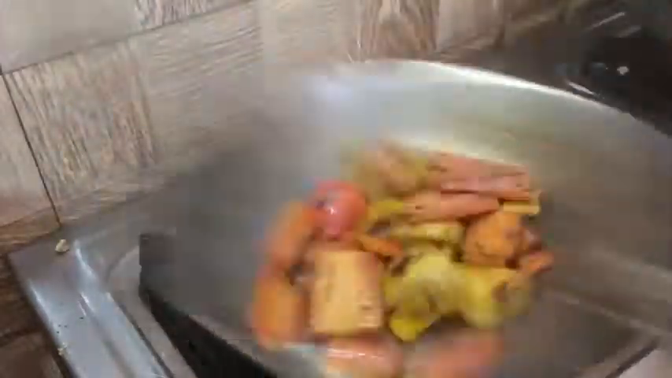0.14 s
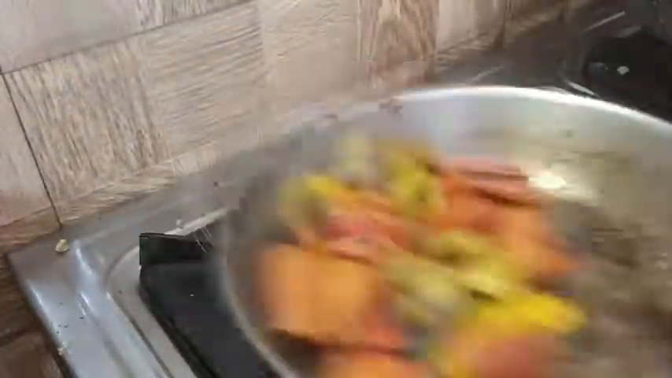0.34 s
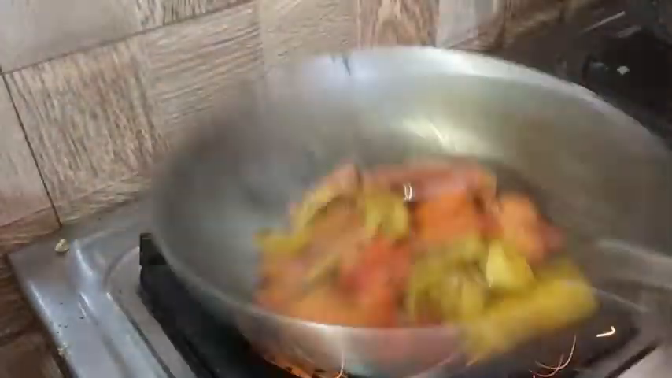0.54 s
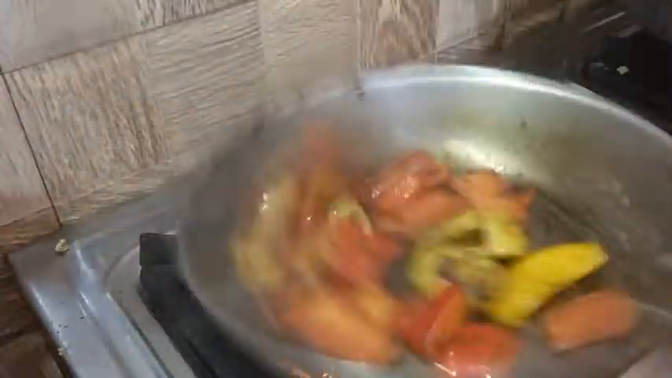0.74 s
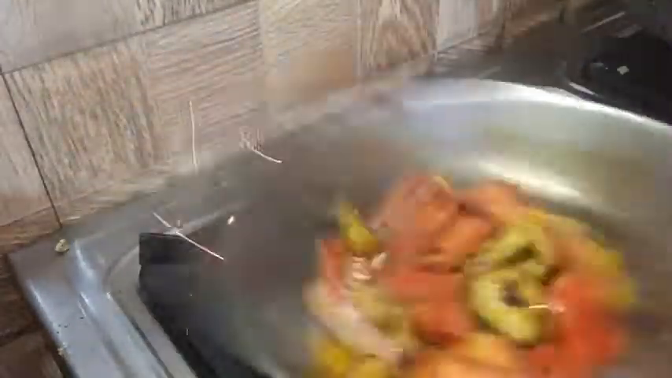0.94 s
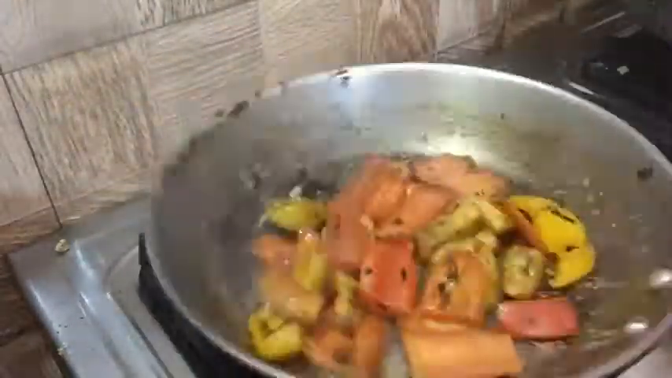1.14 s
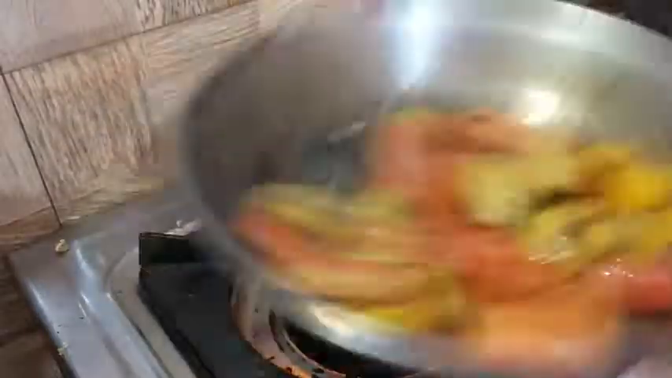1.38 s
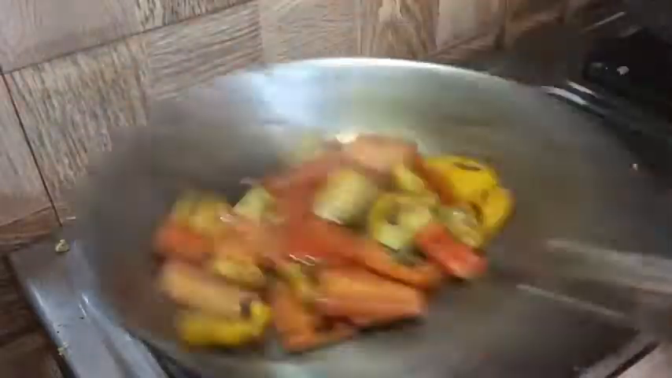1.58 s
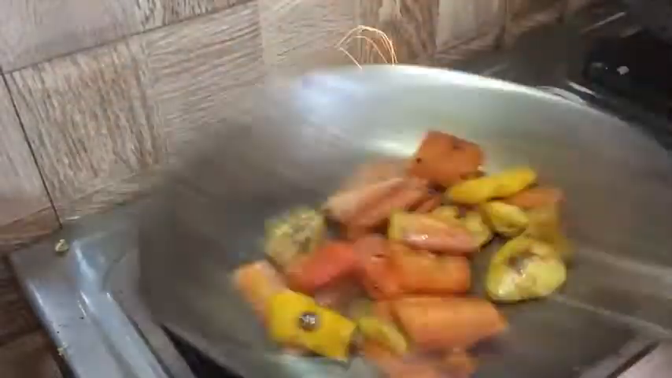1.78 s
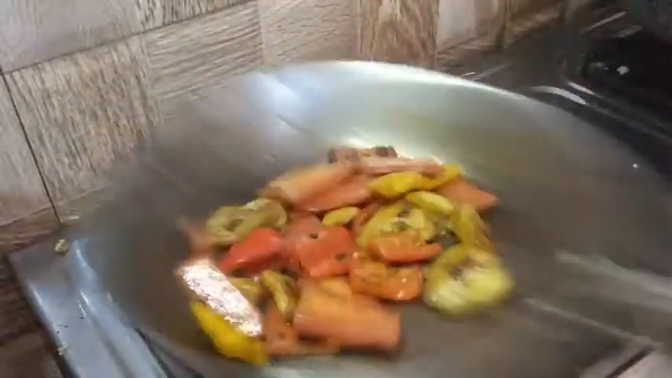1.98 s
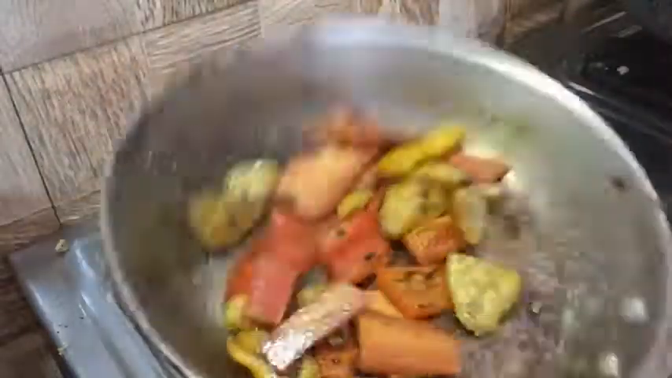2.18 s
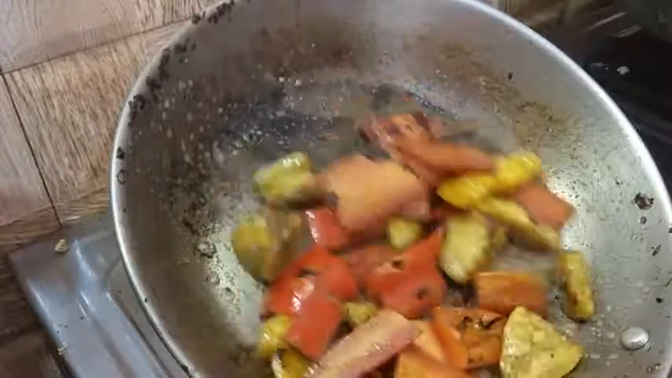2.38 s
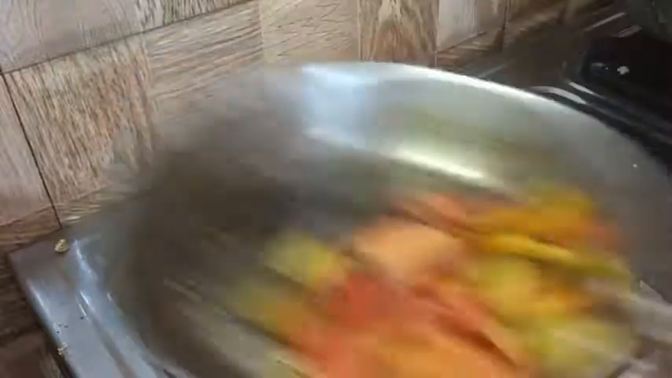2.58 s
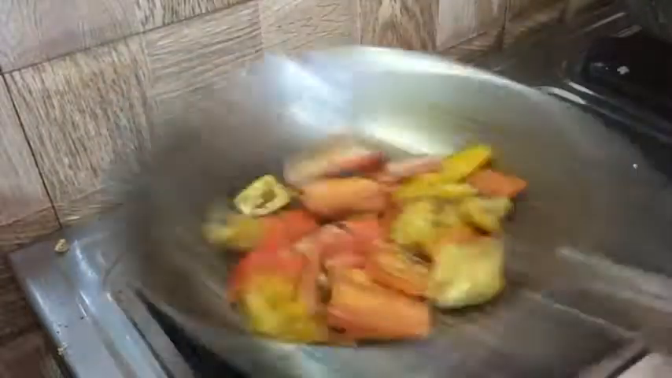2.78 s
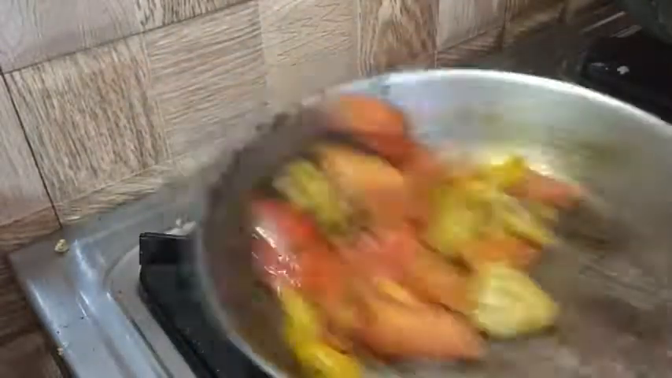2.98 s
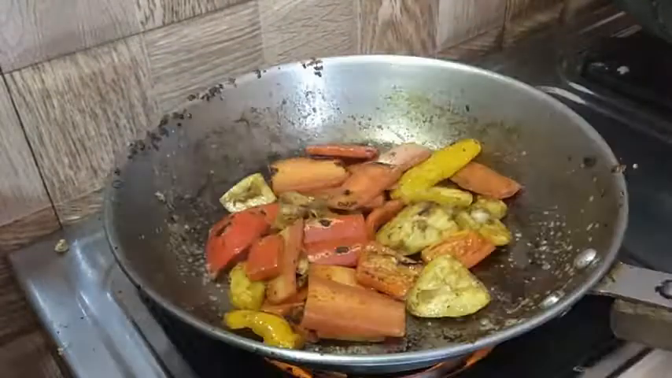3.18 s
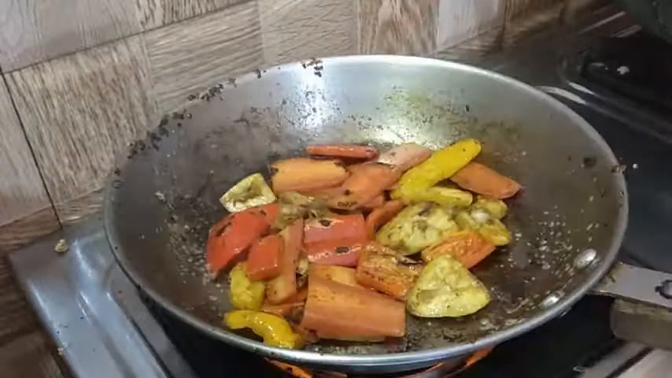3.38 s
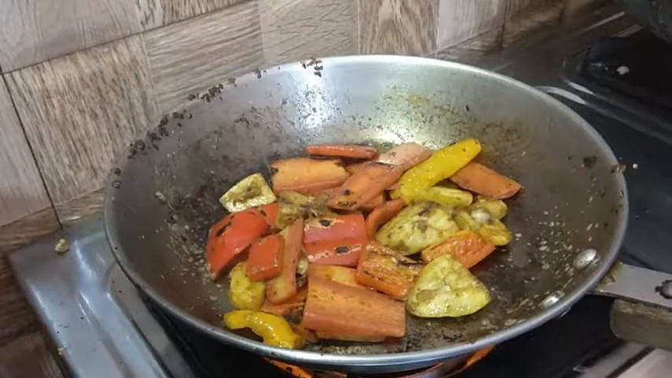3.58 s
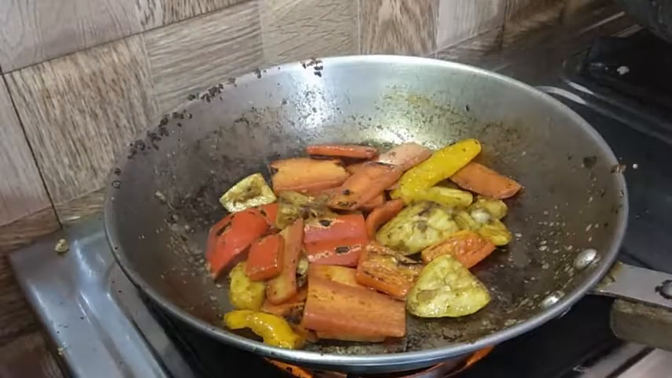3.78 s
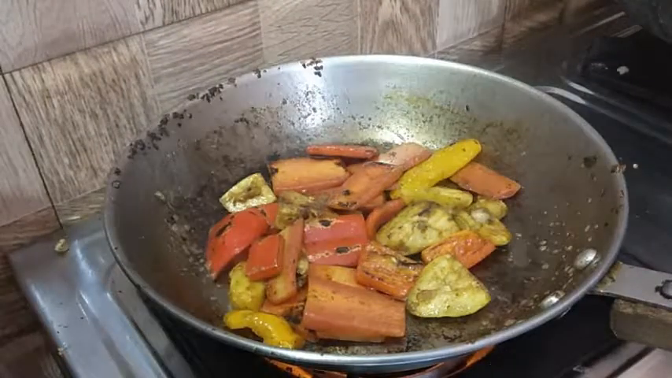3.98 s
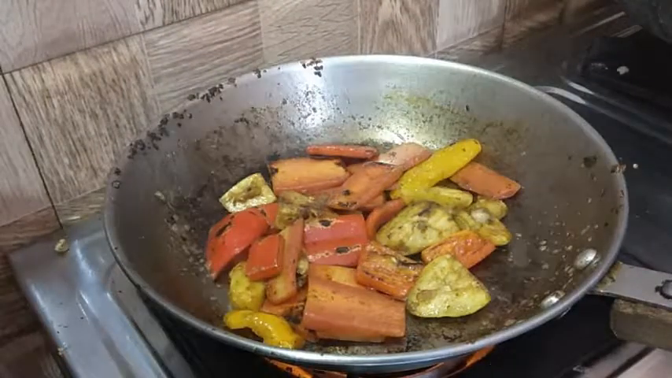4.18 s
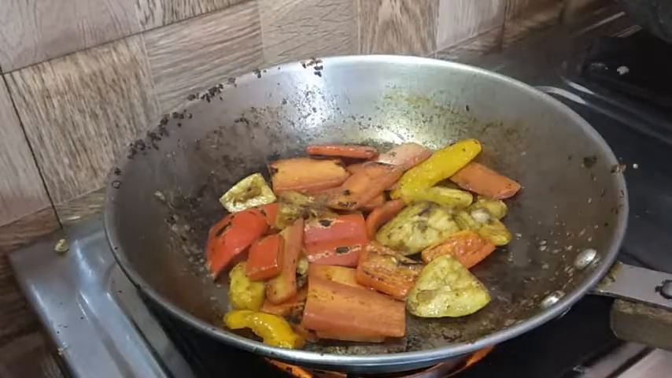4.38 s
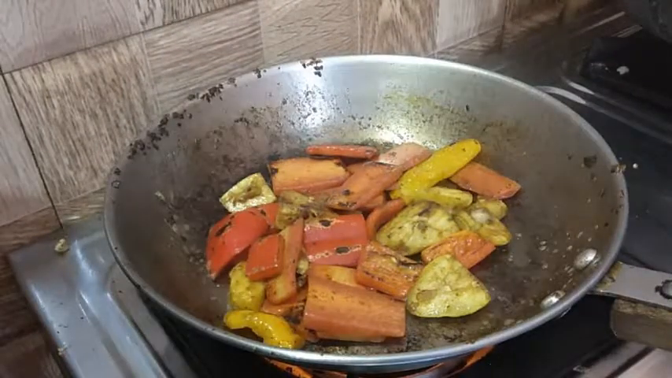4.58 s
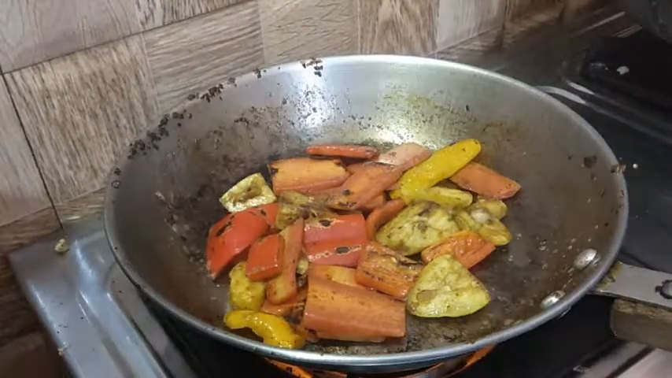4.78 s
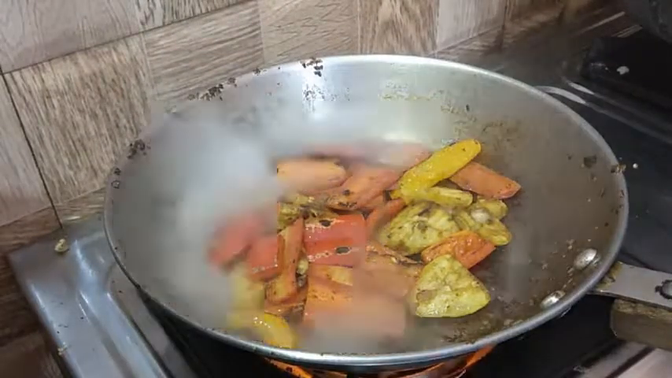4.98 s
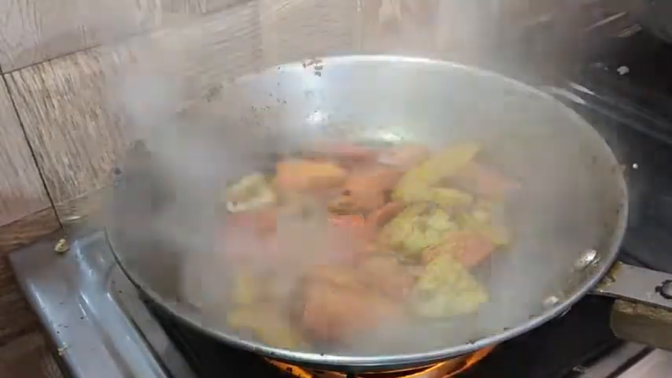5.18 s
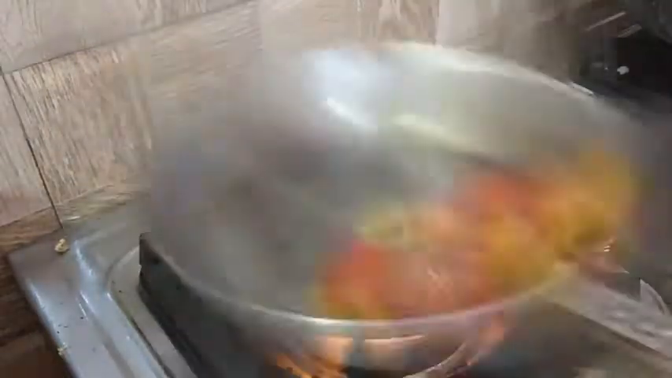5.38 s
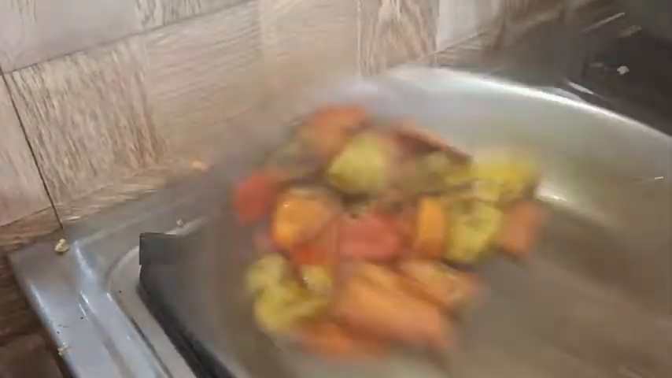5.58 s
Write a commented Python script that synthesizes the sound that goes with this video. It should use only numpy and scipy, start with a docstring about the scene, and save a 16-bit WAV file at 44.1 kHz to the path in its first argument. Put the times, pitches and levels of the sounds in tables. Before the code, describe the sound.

A close, phone-like kitchen sound of a steel wok being tossed on a gas stove. From the very start, rough, ringing metal knocks and scrapes follow each other many times a second, with bright frying sizzle beneath; a tiny high squeak slips in around 0.65 s. The clatter thins after 1.0 s, the sizzle briefly drops near 1.25 s, and hard banging returns from 1.5 to 2.1 s. A pause leaves sizzle, fading then snapping back at 2.3 s, and burner hum. A third run of rattling lasts from 2.5 to about 3.1 s. Then the pan sits still: soft crackling oil over a wavering, mid-low flame hum and roar, with sharp spits near 4.0, 4.2, 4.4 and 4.6 s. At about 4.9 s a sharp spit and a burst of hissing steam flare up as the burner suddenly dips, then recovers. Metal clatter resumes at 5.25 s over rising sizzle until the cut at 5.6 s.

```python
"""Sharp metal knocks and scrapes: a steel wok of vegetables is shaken on the iron stand of a gas stove.
Each knock is a rasp of random clicks that rings the pan's modes; one brief squeak has a strong octave.
Oil sizzles as coloured noise and clicks, fading twice and returning at once, with loud spits and one
burst of steam. Below lies the burner: wavering tones and a soft noise roar, with one sudden dip.
A close phone dulls the top, limits the loudest knocks and thins the bass."""
import sys
import numpy as np
from scipy import signal
from scipy.fft import rfft, irfft
from scipy.io import wavfile
from scipy.ndimage import uniform_filter1d, minimum_filter1d

SR = 44100
rng = np.random.default_rng(int(sys.argv[2]) if len(sys.argv) > 2 else 0)


def digitize_waveform(pressure):
    """Quantize a signal to 16-bit integers and store it at the path in sys.argv[1].

    Rows of a 2-D input are taken as channels; values are limited to [-1, 1].
    """
    field = np.atleast_2d(pressure).T
    bounded = np.clip(field, -1, 1)
    quanta = np.round(bounded * 32767).astype(np.int16)
    wavfile.write(sys.argv[1], SR, quanta)


def boost(x):
    """Linear amplitude factor 10**(x/20) for a level x in decibels (scalar or array-like)."""
    u = np.asarray(x, float) / 20
    return 10 ** u


N = 248724  # samples

# spectrum of frying oil: freq_hz, relative_level_db (per Hz)
SIZZLE_SPECTRUM = [(30, -3.5), (300, -12.5), (800, -9.5), (1100, -5.5), (1900, -0.5), (4000, -4),
                   (7000, -5), (12000, -7)]


def curve(rows):
    """Level against time: table points joined by straight lines."""
    time_s, level_db = np.transpose(rows)
    return np.interp(np.arange(N) / SR, time_s, level_db)


def colour(points, size):
    """Causal (minimum-phase) response with the given spectrum, from the folded cepstrum."""
    hz, db = np.transpose(points)
    log_freq = np.log(np.fft.rfftfreq(size, 1 / SR) + 1)
    log_gain = np.interp(log_freq, np.log(hz), db) * np.log(10) / 20
    cepstrum = irfft(log_gain)
    cepstrum[1:size // 2] *= 2
    cepstrum[size // 2 + 1:] = 0
    return np.exp(rfft(cepstrum))


def tinted(x, points):
    """Filter the sound to a fixed colour, rms 1."""
    y = signal.fftconvolve(x, irfft(colour(points, size=2048)))[:N]
    return y / np.std(y)


def walk(rate_hz):
    """Random levels held 1 / rate_hz s, smoothed twice over that time; spread near 1."""
    hold = int(SR / rate_hz)
    steps = np.repeat(rng.standard_normal(N // hold + 1), hold)
    return 1.735 * uniform_filter1d(uniform_filter1d(steps, hold), hold)[:N]


def grains(size, share, spread_db):
    """Random clicks on a share of the samples, of differing strength, rms 1."""
    present = rng.random(size) < share
    boost_db = spread_db * np.minimum(rng.exponential(size=size), 4.0)
    x = present * rng.standard_normal(size) * boost(boost_db)
    return x / np.std(x)


def resonance(f, hz, width_hz):
    """Response of one ringing mode, gain 1 at its centre."""
    return 1j * f * width_hz / (hz ** 2 - f ** 2 + 1j * f * width_hz)


def drag_force(t, t60_s, rise_ms):
    """Rough contact of pan and iron: clicks that rise, chatter and die away, hardest near the blow."""
    rise = 1 - np.exp(-1000 * t / rise_ms)
    decay = boost(-60 * (t / t60_s) ** 1.053)
    drag = grains(len(t), share=.4, spread_db=1.7) * rise * decay
    chatter_db = 0.84 * np.repeat(rng.standard_normal(len(t) // 128), 128)
    blow = 1 + 1.3 * np.exp(-t / .004)
    return drag * boost(chatter_db) * blow


def wok():
    """Each knock's drag sounds directly as a rasp and rings the pan in a new mix of modes."""
    # knocks on the stand: start_s, level_db (3 x rms of first 20 ms), t60_s, rise_ms (time constant),
    # low_ring_db (base strength of the low modes)
    knocks = [(.0014, 1, 0.19, 0.87, 6), (.0194, -4.5, 0.53, 2.5, 18), (.0651, -1.5, 0.32, 3.6, 15.5),
              (.1525, -0.5, 0.28, 1.9, 11), (.2104, 5.5, 0.15, .8, 13), (.2492, -1.5, 0.14, 2.5, 12),
              (.2762, 3, 0.23, 1, 12.5), (.3114, 2.5, 0.23, 2.8, 15.5), (.3294, -2, 0.19, 3.3, 9),
              (.381, 1.5, 0.2, 1.5, 11), (.4184, 2.5, 0.25, 3, 12.5), (.4887, -0.5, 0.35, 1, 14),
              (.5295, -11, 0.41, 3, 15), (.5852, 1.5, 0.21, 4.8, 15), (.6494, -4.5, 0.055, 1.8, 19),
              (.6987, -9.5, 0.21, 4.7, 16), (.7204, -1.5, 0.15, .74, 16), (.7392, -3.5, .2, 1.6, 10),
              (.7835, -4, .33, 1.5, 15), (.8132, -2.5, .09, 1.7, 18), (.849, -0.5, 0.13, 1.7, 19),
              (.8792, 1.5, 0.44, 0.86, 15), (.9679, 2, 0.22, 0.67, 16), (1.0294, -10.5, 0.082, 3.4, 19),
              (1.0694, -11, .12, 3.3, 11.5), (1.142, -6, 0.11, .37, 17), (1.2537, -8.5, 0.19, 0.46, 14.5),
              (1.4818, -11.5, 0.094, 1.8, -1), (1.5162, -2, 0.18, 0.44, 1), (1.5692, 6, 0.34, .63, 12),
              (1.6192, -2, .19, 2.2, 4), (1.6494, -4.5, 0.12, 2.4, 24), (1.688, 1, 0.33, 0.56, 16),
              (1.7372, -4, .27, 1.8, 18.5), (1.7622, 3, 0.2, 1.4, 6), (1.7894, .5, 0.2, 3.5, 16),
              (1.8685, 6, 0.22, 0.49, 13), (1.8976, -2.5, 0.37, 2.4, 13), (1.9775, 3.5, 0.19, 0.92, 12),
              (1.9994, 3, 0.29, 2.9, 14.5), (2.0394, -3.5, 0.3, 2.1, 15), (2.0832, 2.5, 0.11, 2.6, 6),
              (2.5298, -8, 0.31, 5.2, 17.5), (2.5794, -5, 0.28, 7.8, 16.5), (2.5998, -0.5, 0.095, 2.1, 18),
              (2.6301, 3.5, 0.2, 1.3, 11), (2.6959, -4.5, .26, 4.4, 15), (2.7478, -6, 0.2, 6.4, 20),
              (2.7949, -2.5, 0.2, 2.8, 13.5), (2.8094, -2.5, 0.14, 3.6, 15.5),
              (2.8557, -0.5, 0.26, 0.56, 13.5), (2.9192, -4, 0.2, 3.9, 13), (2.9722, -5, .26, 6, 15.5),
              (3.0125, -5, 0.28, 2.2, 14), (3.034, 1.5, .17, 2.6, 14.5), (3.0693, -9, 0.38, 2.1, 10),
              (5.2525, -1, 0.48, 0.73, 9), (5.3444, -6, 0.24, 4.5, 17.5), (5.3779, -3.5, 0.15, 2.2, 19),
              (5.3994, -2.5, 0.32, 2.9, 18), (5.441, 0, 0.21, 1.3, 10.5), (5.4698, -5, .2, 2.1, 15),
              (5.4995, -3.5, 0.15, 5, 14), (5.5315, -4, 0.22, 0.66, 15), (5.5594, -7.5, 0.46, 5.4, 19),
              (5.612, -1, 0.22, 2.5, 13)]
    # pan modes: freq_hz, width_hz, relative_level_db
    pan_modes = [(463.2, 14.4, -6.5), (532, 75, -11.5), (698, 28, -14), (705.5, 24.4, 4), (823.6, 13.6, -6),
                 (921, 25, -8.5), (1093.5, 19.6, -0.5), (1141, 21, -14), (1269, 42, 0), (1440, 14, -4),
                 (1647, 70, 1), (1830, 23, 5.5), (1900, 41, -24), (2215, 45, 3.5), (2307, 52, -3),
                 (2377, 77, -2), (2456, 98, 0), (2777, 114, -3), (2935, 35, -3), (3470, 150, -6),
                 (3850, 73, -2.5)]
    # direct rasp spectrum: freq_hz, relative_level_db (per Hz)
    rasp_spectrum = [(30, -31), (250, -30), (400, -30.5), (600, 3), (1000, 2.5), (2200, 3.5), (3200, -2.5),
                     (4000, -2), (6000, -5.5), (12000, -9)]
    low_ring_top_hz = 1200
    treble_db, treble_scatter_db = 2, 1.5  # rasp shelf above 4 kHz
    detune = .02  # random relative spread of upper modes, one shift per knock

    size = 16384
    t, f = np.arange(size) / SR, np.fft.rfftfreq(size, 1 / SR)
    low = np.array(pan_modes)[:, 0] < low_ring_top_hz
    rasp = colour(rasp_spectrum, size)
    out = np.zeros(N + size)
    draws = rng.standard_normal((len(knocks), len(pan_modes) + 2))
    for (start_s, level_db, t60_s, rise_ms, low_ring_db), (bright, shift, *mix) in zip(knocks, draws):
        drag = drag_force(t, t60_s, rise_ms)
        shelf_gain = boost(treble_db + treble_scatter_db * bright)
        shelf = 1 + (shelf_gain - 1) * 1j * f / (4000 + 1j * f)
        strength_db = np.where(low, low_ring_db + 0.81 * np.abs(mix), 5.7 + 2.2 * np.abs(mix))
        strength = boost(strength_db) * np.sign(mix)
        modes = []
        for hz, width_hz, mode_db in pan_modes:
            mode_hz = hz * (1 + detune * shift * (hz > low_ring_top_hz))
            modes.append(boost(mode_db) * resonance(f, mode_hz, width_hz))
        body = rasp * shelf + strength @ np.array(modes)
        knock = irfft(rfft(drag) * body)
        nominal_peak = 3 * np.std(knock[:int(.02 * SR)])
        i = int(start_s * SR)
        out[i:i + size] += boost(level_db) * knock / nominal_peak
    return out[:N]


def squeak():
    """A brief metal squeak: a tone and its equally strong octave under a half-sine swell."""
    # one squeak: start_s, length_s, pitch_hz, level_db (peak of each partial)
    squeak_event = (.64, .028, 3870, -19.0)
    start_s, length_s, pitch_hz, level_db = squeak_event
    t = np.arange(N) / SR - start_s
    phase = 2 * np.pi * pitch_hz * t
    swell = np.sin(np.pi * np.clip(t / length_s, 0, 1))
    return boost(level_db) * swell * (np.sin(phase) + np.sin(2 * phase))


def sizzle_level():
    """Frying gain: in each dip the sizzle fades, then returns at once."""
    # frying: time_s, level_db (ahead of dips)
    fry_level = [(0, -18.5), (.46, -18), (.68, -18), (1.19, -25), (1.5, -22), (1.9, -23.5), (2.5, -20.5),
                 (2.8, -21.5), (3.17, -26), (3.6, -25.5), (3.95, -26.5), (4.1, -24), (4.2, -26),
                 (4.5, -29.5), (4.7, -26), (4.9, -28.5), (5.3, -19), (5.64, -16)]
    # dips in the frying: start_s, end_s, drop_db (reached at the end)
    dips = [(1.201, 1.268, -16), (2.0, 2.314, -5.5)]
    now = np.arange(N) / SR
    level_db = curve(fry_level)
    for start_s, end_s, drop_db in dips:
        progress = np.clip((now - start_s) / (end_s - start_s), 0, 1)
        level_db = level_db + drop_db * (now < end_s) * progress ** 0.47
    return boost(level_db)


def steam_level():
    """Steam gain: liquid hits the hot pan, flares up and decays; overlapping flares add in power."""
    # flares: start_s, level_db, t60_s
    flares = [(4.876, -11.5, 2.66), (4.888, -20, 0.27), (4.952, -14.5, 0.19)]
    rise_s = 0.002  # time constant
    now = np.arange(N) / SR
    level = 0
    for start_s, level_db, t60_s in flares:
        since = np.maximum(now - start_s, 0)
        flare = boost(level_db - 60 * since / t60_s) * (1 - np.exp(-since / rise_s))
        level = np.hypot(level, flare)
    return level


def frying():
    """Bursting droplets (clicks) over steam hiss (noise), flickering separately in two bands."""
    split_hz, dull_db = 2500, -2  # dull_db: gain of the lower band
    burst = 1.02 * rng.standard_normal(N) + 0.46 * grains(N, share=.04, spread_db=4.6)
    fizz = tinted(burst, SIZZLE_SPECTRUM)
    dull = signal.sosfilt(signal.butter(1, split_hz, fs=SR, output="sos"), fizz)
    bright = fizz - dull
    bright_flicker = boost(.7 * walk(60) + .7 * walk(12))
    dull_flicker = boost(.7 * walk(60) + 1.2 * walk(12))
    flickering = bright_flicker * bright + boost(dull_db) * dull_flicker * dull
    return np.hypot(sizzle_level(), steam_level()) * flickering


def spits():
    """Single loud spits of oil: noise with a fast and a slower decay, coloured like the sizzle."""
    # spits: start_s, level_db (peak ahead of colouring)
    spit_events = [(3.9814, -4.5), (4.2292, -17), (4.3892, -10), (4.6412, -21), (4.876, -6), (4.961, -6)]
    size = 2000
    t = np.arange(size) / SR
    out = np.zeros(N + size)
    for start_s, level_db in spit_events:
        decay = np.exp(-t / 0.0012) + 0.47 * np.exp(-t / 0.0094)
        spit = rng.standard_normal(size) * decay
        i = int(start_s * SR)
        out[i:i + size] += boost(level_db) * spit / np.max(np.abs(spit))
    return np.std(out) * tinted(out, SIZZLE_SPECTRUM)


def burner():
    """The flame roars softly under many sustained tones that drift and waver a little."""
    # burner level, with a sudden dip near 4.9 s: time_s, level_db
    burner_level = [(0, -6.5), (2.3, -2), (4.86, -2), (4.9, -14), (5.08, -8.5), (5.15, -3), (5.64, -4)]
    # tones: freq_hz, level_db (rms ahead of burner level)
    hum_tones = [(269.5, -41.5), (325, -42), (428, -41.5), (437, -45), (483, -43.5), (493, -32.5),
                 (504, -45.5), (539, -45), (651, -45), (671.5, -40), (708, -53), (727, -41.5), (764, -49),
                 (818.5, -38), (874, -42.5), (1200, -47), (1211, -41), (1258, -50), (1290, -44.5),
                 (1367, -50), (1470, -46)]
    # roar spectrum: freq_hz, relative_level_db (per Hz)
    roar_spectrum = [(30, -28.5), (230, -20.5), (300, -13), (400, -4.5), (490, -0.5), (570, -13.5),
                     (700, -9), (1300, -9), (2500, -17), (6000, -29.5)]
    drift_hz, waver_db = 1.5, 1.5
    roar_db = -29  # ahead of burner level
    hum = 0
    for freq_hz, level_db in hum_tones:
        cycles = np.cumsum(freq_hz + drift_hz * walk(6)) / SR + rng.random()
        gain = np.sqrt(2) * boost(level_db + waver_db * walk(10))
        hum = hum + gain * np.sin(2 * np.pi * cycles)
    roar = boost(roar_db + 1.3 * walk(15)) * tinted(rng.standard_normal(N), roar_spectrum)
    return boost(curve(burner_level)) * (hum + roar)


def scene():
    """Pan, food and flame at one microphone."""
    return (wok() + squeak() + frying() + spits() + burner())[None]


def roll_off(x):
    """The treble ends steeply here."""
    return signal.sosfilt(signal.butter(12, 15850, fs=SR, output="sos"), x)


def record(dry):
    """The phone cuts the top steeply, limits the loudest peaks very fast and thins the bass."""
    stopband_hz, ceiling, hold_samples = 12520, .75, 5
    x = signal.sosfilt(signal.cheby2(9, 50.0, stopband_hz, fs=SR, output="sos"), dry)
    needed_gain = np.minimum(1, ceiling / (np.abs(x) + 1e-9))
    gain = uniform_filter1d(minimum_filter1d(needed_gain, hold_samples), hold_samples)
    x = signal.sosfilt(signal.butter(1, 80, "high", fs=SR, output="sos"), x * gain)
    return roll_off(x)


dry = scene()
out = record(dry)
digitize_waveform(out)
```